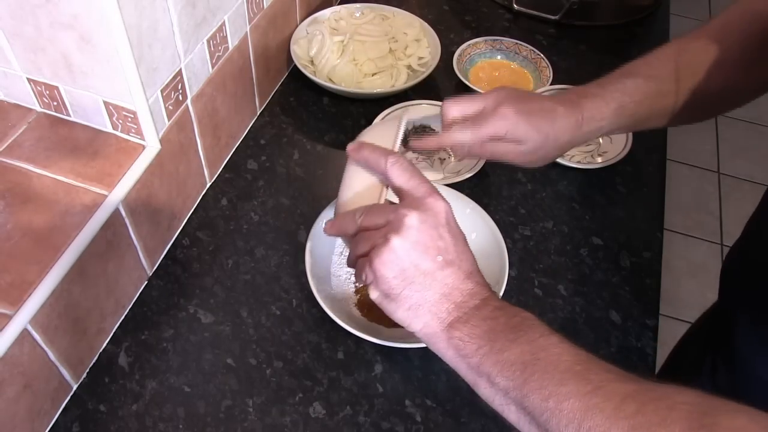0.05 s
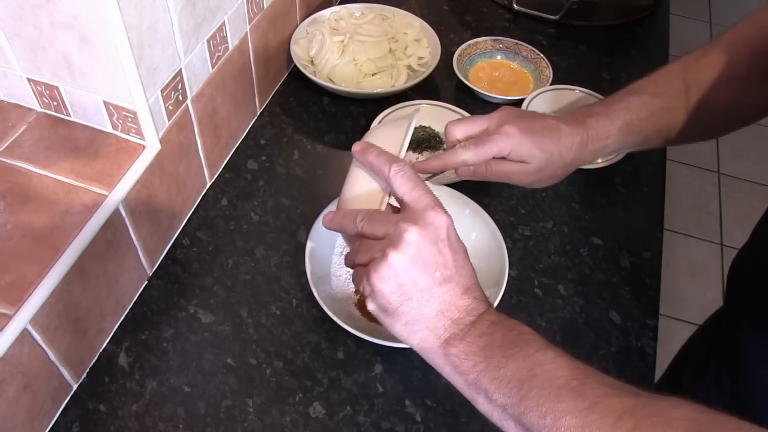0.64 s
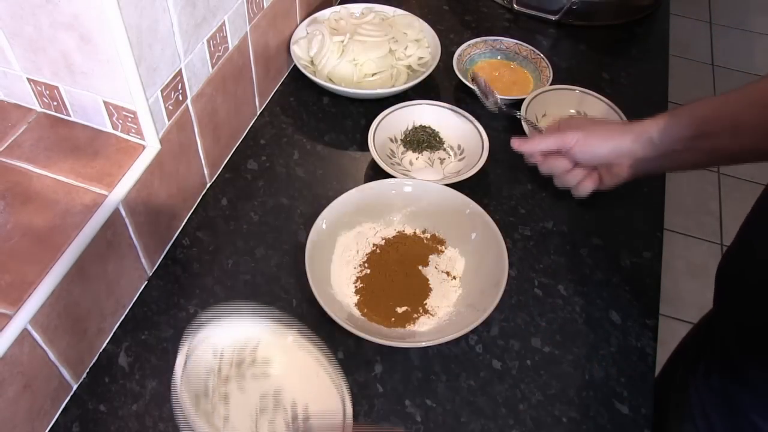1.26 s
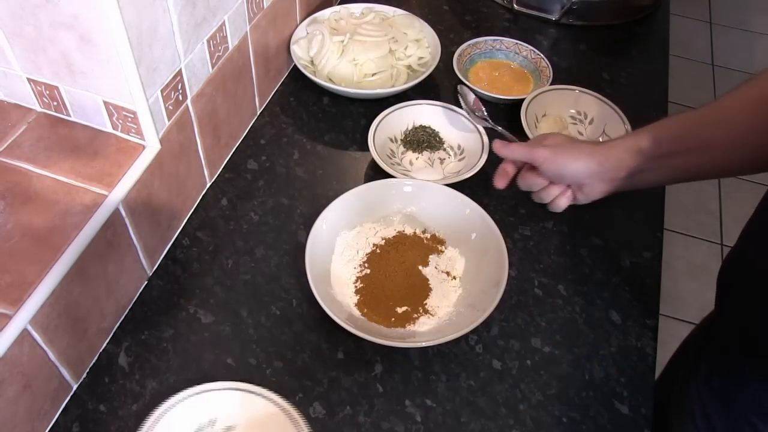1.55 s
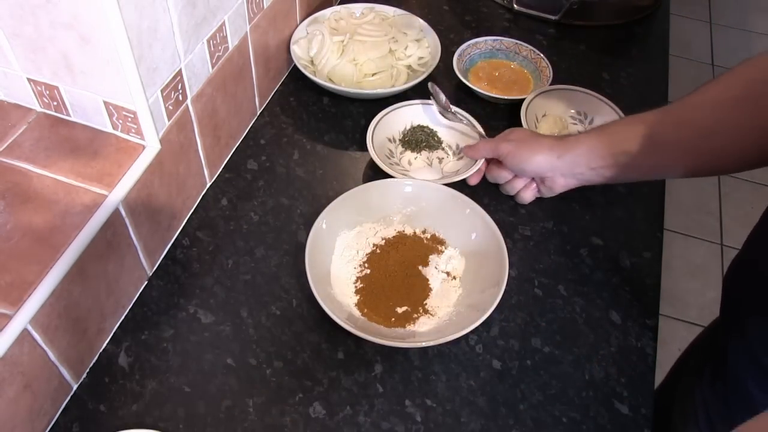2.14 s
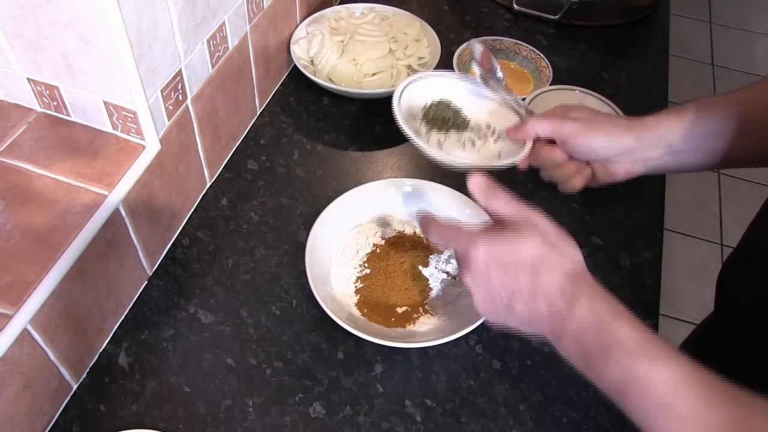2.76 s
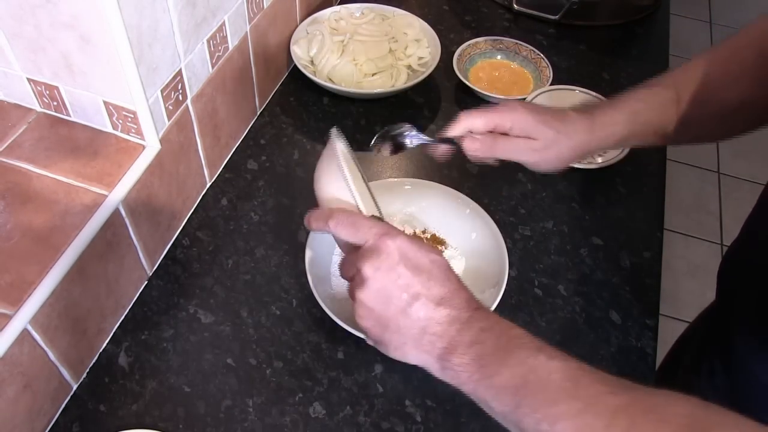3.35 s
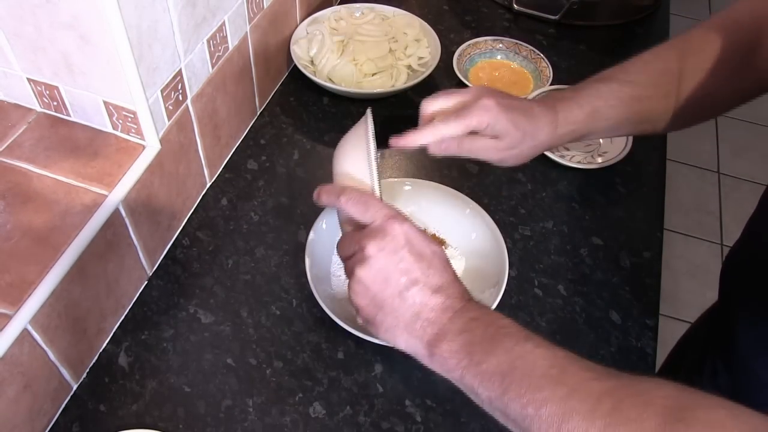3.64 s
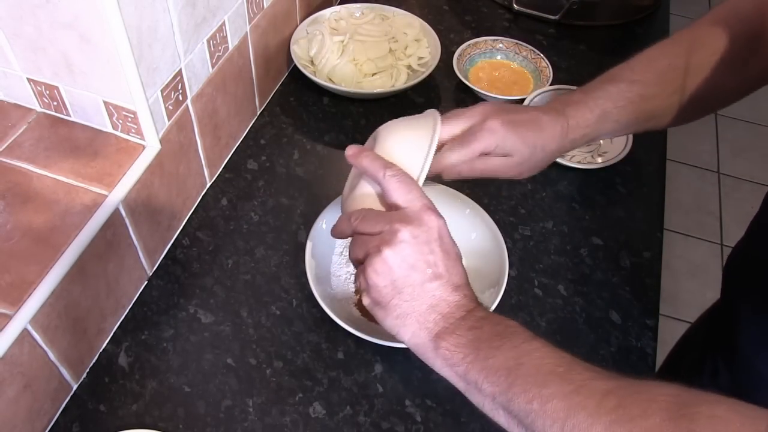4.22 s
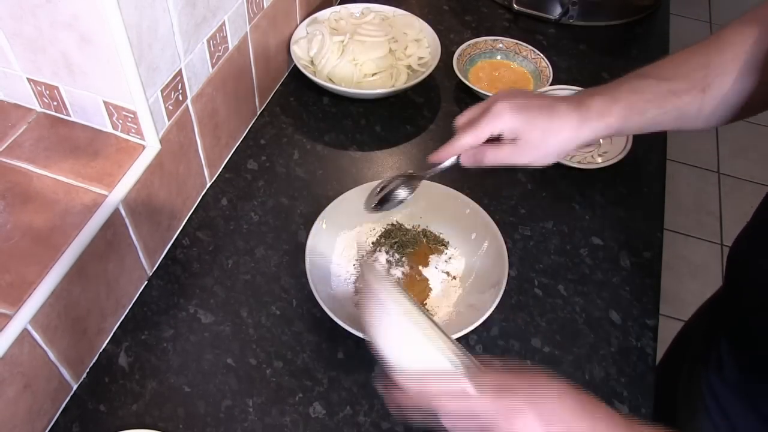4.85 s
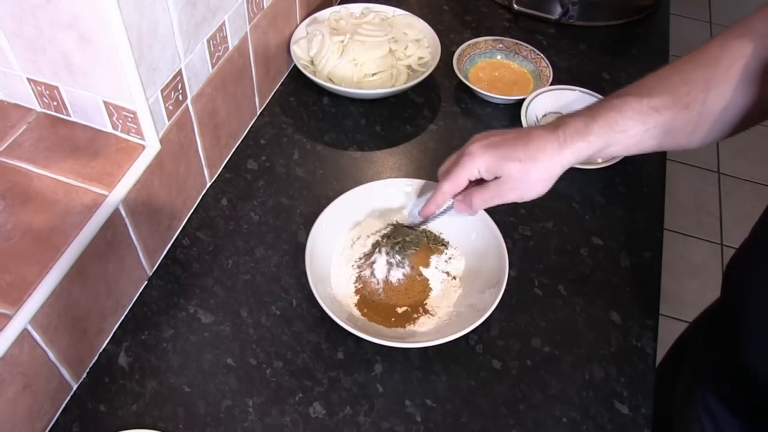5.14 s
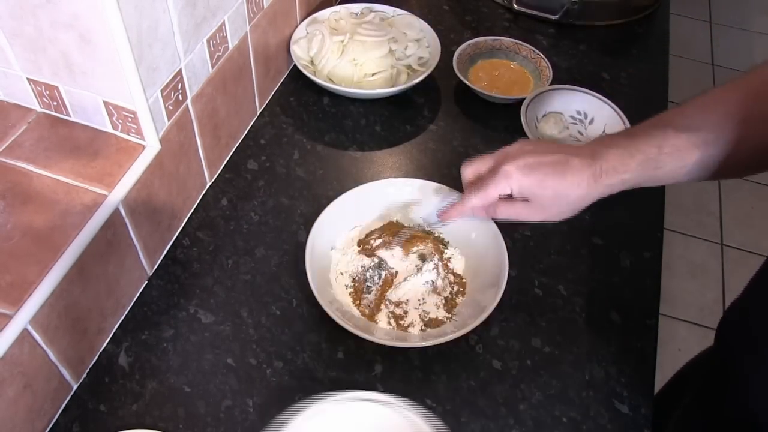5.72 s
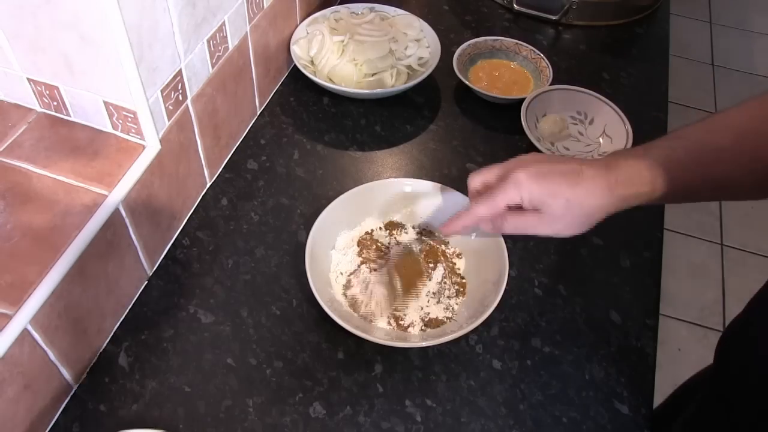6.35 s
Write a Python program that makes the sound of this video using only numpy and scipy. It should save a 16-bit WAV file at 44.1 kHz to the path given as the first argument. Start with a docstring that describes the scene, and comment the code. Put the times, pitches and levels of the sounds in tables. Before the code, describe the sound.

From the start to about 1 second, a metal fork quickly taps and scrapes spices off a small china dish, with sharp ringing clinks and short squeaky rasps. Just after 2 seconds the dish is set down hard on the worktop, a little further off, rocking in several dull knocks; a clear crockery note follows around 2.4 seconds and fades. Dry herbs slide faintly over china just after 3 seconds. From 3.7 to 4.6 seconds the fork scrapes and clinks on a second dish. From about 5.1 seconds it stirs flour in a ceramic bowl: three soft, hissing, gritty strokes, the last near 6.2 seconds, with muffled bumps at 5.2 and 5.5 seconds. A very faint swish recurs about once a second over quiet, steady rumble and hiss. Loud blows sound flattened, and the tiled kitchen's short echo swells back after each.

```python
"""A fork knocks and scrapes spices off two small china dishes into a bowl of flour, in a tiled kitchen.
Each tap makes the china ring; each scrape sticks and slips, so it rasps and squeaks. Between the two
dishes, the emptied one is set down hard and crockery rings on; at the end the fork starts to stir.
A faint swish repeats over the room's rumble and hiss. A fast gain control (an automatic volume knob)
flattens every blow and lets the room's echo swell back up."""
import sys
import numpy as np
from scipy import signal
from scipy.fft import irfft
from scipy.io import wavfile
from scipy.ndimage import uniform_filter1d

SR = 44100
rng = np.random.default_rng(int(sys.argv[2]) if len(sys.argv) > 2 else 0)


def wrap_up_sound(samples):
    """Save the sound to the file named by the first command line argument, as 16-bit audio."""
    columns = np.atleast_2d(samples).T
    # keep every value between -1 and 1, then stretch to whole-number steps
    tamed = np.clip(columns, -1, 1)
    steps = np.round(tamed * 32767).astype(np.int16)
    wavfile.write(sys.argv[1], SR, steps)


N = 286209


def amp(db):
    """Turns decibels into a volume factor."""
    return 10 ** (np.asarray(db) / 20)


def unit(x):
    """Scales a sound to an average power of 1."""
    return x / np.sqrt(np.mean(x ** 2) + 1e-20)


def fade(size, t60):
    """A dying-away curve; the fade time t60 is the seconds it takes to drop 60 dB."""
    return amp(-60 * np.arange(size) / SR / t60)


def read(points, hz):
    """Joins a table's points with straight lines along a scale of octaves."""
    frequency, value = np.transpose(points)
    return np.interp(np.log(hz + 1), np.log(frequency), value)


def add(mix, s, sound):
    """Mixes a sound in at s seconds; it may already be under way when the scene opens."""
    start = round(s * SR)
    sound = sound[max(-start, 0):]
    part = mix[max(start, 0):][:len(sound)]
    part += sound[:len(part)]


def noise(spectrum, size):
    """Steady noise with the given colour (its balance of low and high frequencies)."""
    hz = np.fft.rfftfreq(size, 1 / SR)
    phases = np.exp(2j * np.pi * rng.random(len(hz)))
    return unit(irfft(amp(read(spectrum, hz)) * phases, size))


def burst(spectrum, t60, colour_db=lambda hz: 0):
    """A puff of noise: many crowded vibrations that die quickly."""
    hz = abs(np.fft.fftfreq(8192, 1 / SR))
    puff = rng.standard_normal(len(hz)) * fade(len(hz), t60)
    gain = amp(read(spectrum, hz) + colour_db(hz + 1))
    response = np.exp(np.conj(signal.hilbert(np.log(gain))))  # keeps the start sharp
    puff = np.fft.ifft(np.fft.fft(puff) * response).real
    return puff / np.linalg.norm(puff)


def ring(tones, colour_db=lambda hz: 0, vary_db=2, detune=0.0042):
    """A struck object rings with its own tones; grip and contact point shift them a little each time."""
    hz, db, t60 = np.transpose(tones)[:, :, None]
    loud, shift, sign = rng.standard_normal((3, len(hz), 1))
    t = np.arange(8192) / SR
    waves = np.sign(sign) * np.sin(2 * np.pi * hz * (1 + detune * shift) * t) * fade(len(t), t60)
    waves /= np.linalg.norm(waves, axis=1, keepdims=True)
    return (amp(db + colour_db(hz) + vary_db * loud) * waves).sum(0)


# The tones of each china dish: (frequency [Hz], energy [dB], fade time [s])
SPICE_DISH_TONES = [(1177, -14.5, 0.044), (1326, -16, 0.035), (1620, -20, 0.027), (2330, -19.5, 0.11),
                    (2920, -10, 0.036), (4015, -2, 0.042), (5385, -7, .09), (6045, -10.5, .12),
                    (6510, -13, .07), (6790, -17, .05), (7687, -12.5, .16), (8410, -16, .04),
                    (9910, -19.5, .08), (11340, -15, 0.02), (12370, -17, 0.017)]
HERB_DISH_TONES = [(1230, -12, 0.012), (1960, -11.5, 0.013), (2463, -13.5, 0.041), (2977, -10, 0.04),
                   (3995, -2, 0.038), (4220, -9, 0.025), (4940, -9.5, .05), (5223, -6, 0.072),
                   (5330, -16, 0.092), (5840, -14, 0.12), (6800, -20, 0.083), (7500, -9, 0.074),
                   (8410, -16, 0.1), (11700, -19.5, 0.019)]
# The click of something touching china: (frequency [Hz], level [dB])
CLICK_COLOUR = [(100, -22.5), (300, -16.5), (480, -2.5), (750, -13), (1100, 2.5), (3000, 3), (5000, 3),
                (7000, 3), (9500, -6), (12500, -11), (16000, -35)]
RIM_HZ, STIFFER_DB = 4040, 2  # a spot stiffer than the rim rings higher, and brighter per octave up


def dish(s, contact, click_db, click_t60):
    """The dish in hand rings and clicks; contact is (brightness [dB/octave], favoured Hz, boost dB)."""
    tilt_db, favoured_hz, boost_db = contact
    favour = lambda hz: np.exp(-(np.log2(hz / favoured_hz) / .13) ** 2)
    colour_db = lambda hz: tilt_db * np.log2((hz + 500) / RIM_HZ) + boost_db * favour(hz)
    tones = SPICE_DISH_TONES if s < 2 else HERB_DISH_TONES
    body = ring(tones, colour_db) + amp(click_db) * burst(CLICK_COLOUR, click_t60, colour_db)
    return body / np.linalg.norm(body)


def stroke(length, edge):
    """The pressure of one stroke swells and eases off; an edge under 1 bites and lets go abruptly."""
    progress = np.clip(np.arange(16384) / SR / length, 0, 1)
    return abs(np.sin(np.pi * progress)) ** edge


def slips(rate, jitter, spread_db):
    """Surfaces stick and slip, making uneven clicks, about `rate` each second."""
    gap, size = rng.standard_normal((2, 1500))
    at = (np.cumsum(np.exp(jitter * gap)) * SR / rate).astype(int)
    clicks = amp(spread_db * size) * rng.choice([-1, 1], len(at))
    return unit(np.bincount(at, clicks, 16384)[:16384])


def squeak(progress, from_hz=1130, to_hz=1550, waver=0.0447):
    """Slips fall into a ragged rhythm that quickens as the slide goes on."""
    wander = unit(uniform_filter1d(rng.standard_normal(len(progress)), size=60))
    hz = (from_hz + (to_hz - from_hz) * progress) * (1 + waver * wander)
    cycles = np.cumsum(hz) / SR
    return unit(sum(np.cos(2 * np.pi * k * (cycles + rng.random())) * min(k, 3) for k in range(1, 12)))


def drag(s, length, contact, hiss_db, squeak_db=-0.5, build_db=5):
    """Something slides over the dish, rubbing ever harder; the ring changes along the way."""
    rasp = slips(rate=3200, jitter=.5, spread_db=3)
    progress = np.clip(np.arange(len(rasp)) / SR / length, 0, 1)
    pressure = stroke(length, edge=0.58) * amp(build_db * (progress - .5))
    friction = unit(rasp + amp(squeak_db) * squeak(progress)) * pressure
    sound = 0
    for share in np.cos(np.pi / 2 * progress), np.sin(np.pi / 2 * progress):  # start spot, end spot
        body = dish(s, contact, click_db=hiss_db, click_t60=0.016)
        body *= fade(len(body), t60=.07)  # the contact muffles the ring
        sound = sound + signal.fftconvolve(friction * share, body)
    return sound


# The fork dragged over a dish: (time [s], length [s], level [dB], favoured frequency [Hz])
FORK_SCRAPES = [(-0.02, 0.062, -9, 5250), (0.063, 0.043, -1, 5140), (0.084, 0.051, 5, 7850),
                (0.232, .06, 6.5, 4900), (0.385, 0.063, 5.5, 3610), (0.547, 0.042, 10, 4140),
                (0.659, 0.029, 7, 3980), (3.743, .09, 4.5, 5250), (3.839, 0.073, -21, 5300),
                (4.426, 0.045, 3, 3830)]


def fork_scrapes(typical_s=0.065, boost_db=6.5):
    """Short, rasping drags over the china; longer ones are faster and so brighter."""
    out = np.zeros(N)
    for s, length, db, hz in FORK_SCRAPES:
        tilt_db = 3 * np.log2(length / typical_s) + STIFFER_DB * np.log2(hz / RIM_HZ)
        add(out, s, amp(db - 4) * drag(s, length, (tilt_db, hz, boost_db), hiss_db=-2))
    return out


# The room's background noise: (frequency [Hz], level [dB])
ROOM_COLOUR = [(18, -2.5), (36, -17), (46, 8), (58, -7), (150, -8.5), (190, -16.5), (240, -9), (330, -14.5),
               (480, -18.5), (750, -22.5), (1100, -28), (1760, -30.5), (4060, -33), (16000, -45)]


def room_noise():
    """A quiet, steady rumble and hiss."""
    return amp(-33.5) * noise(ROOM_COLOUR, N)


# How long the kitchen echoes: (frequency [Hz], fade time [s])
ECHO_TIMES = [(150, 0.5), (500, 0.48), (1500, 0.62), (4000, 0.48), (8000, 0.41), (15000, 0.28)]


def kitchen_echo(sound, build_up_s=0.00062, bounces_per_s=5000):
    """Sound bounces densely off the tiles; the highest frequencies die first."""
    t = np.arange(SR) / SR
    bounces = rng.standard_normal(SR) * (rng.random(SR) < bounces_per_s / SR)
    bounces *= 1 - np.exp(-(t / build_up_s) ** 2)
    hz, when, bands = signal.stft(bounces, SR, nperseg=256)
    bands *= amp(-60 * when / read(ECHO_TIMES, hz)[:, None])
    tail = signal.istft(bands, SR, nperseg=256)[1]
    return signal.fftconvolve(sound, tail / np.linalg.norm(tail))[:N]


def blow():
    """One hit, after which the fork's prongs chatter briefly against the china."""
    chatter = slips(rate=1500, jitter=.5, spread_db=3)
    chatter *= fade(len(chatter), t60=0.1)
    return signal.unit_impulse(len(chatter)) + chatter / np.linalg.norm(chatter)


# The fork striking a dish: (time [s], level [dB], favoured frequency [Hz])
FORK_TAPS = [(0.182, 14, 5170), (0.3775, 4, 4400), (0.5413, 12.5, 3770), (0.659, 11.5, 5530),
             (0.7661, 12, 5400), (0.888, 19.5, 5500), (3.7445, 6.5, 5000), (4.0635, 11.5, 6850),
             (4.265, 16, 3706), (4.419, 1, 3780), (4.596, 10, 2370)]


def fork_taps(rim_tilt_db=-2, boost_db=7.5):
    """Sharp clinks: each blow sets the dish ringing."""
    out = np.zeros(N)
    for s, db, hz in FORK_TAPS:
        tilt_db = rim_tilt_db + STIFFER_DB * np.log2(hz / RIM_HZ)
        body = dish(s, (tilt_db, hz, boost_db), click_db=-2.5, click_t60=0.025)
        add(out, s, amp(db + 13) * signal.fftconvolve(blow(), body))
    return out


# A soft swish: (frequency [Hz], level [dB])
SWISH_COLOUR = [(300, -46), (700, -3), (1100, -13), (2000, -8.5), (3300, -9), (6000, -19.5), (12000, -43)]


def swishes(first_s=0.87, every_s=1.042):
    """A faint swish comes round steadily, about once a second."""
    out = np.zeros(N)
    for turn in range(6):
        swell = stroke(length=.135, edge=.8)
        add(out, first_s + turn * every_s, amp(-38) * swell * noise(SWISH_COLOUR, len(swell)))
    return out


# Herbs sliding on a tipped dish: (time [s], length [s], level [dB], favoured frequency [Hz])
HERB_SLIDES = [(1.18, 0.051, -31, 7740), (3.033, 0.05, -35.5, 4000), (3.146, 0.044, -27.5, 5950),
               (3.203, 0.066, -32, 5950), (3.29, 0.15, -40.5, 2730)]


def herb_slides(tilt_db=4.5, boost_db=8.5):
    """Dry herbs and powder slide over the china with a faint, bright hiss."""
    out = np.zeros(N)
    for s, length, db, hz in HERB_SLIDES:
        add(out, s, amp(db - 4.5) * drag(s, length, (tilt_db, hz, boost_db), hiss_db=3.5))
    return out


# The dish landing and rocking: (time [s], level [dB])
DISH_KNOCKS = [(2.139, 18.5), (2.18, 15), (2.2, 4.5), (2.234, 1.5), (2.3165, 15.5)]
# The worktop's thud: (frequency [Hz], level [dB])
THUD_COLOUR = [(50, -51), (110, -5.5), (170, -4.5), (260, 2), (400, -0.5), (800, -2.5), (1100, 0.5),
               (1500, -7.5), (2200, -14), (4000, -28.5), (8000, -37), (16000, -78)]
# The landing dish's tones: (frequency [Hz], energy [dB], fade time [s])
LANDING_TONES = [(3960, 1.5, 0.18), (5260, 6.5, 0.054), (7900, -10, 0.23), (9700, -20, .15),
                 (11700, -24, .15)]


def dish_set_down(hard_knock_db=18.5, dulling=0.66):
    """Dull knocks on the worktop, each with a tick of glaze and a trace of the dish's own ring."""
    out = np.zeros(N)
    for s, db in DISH_KNOCKS:
        tilt_db = dulling * (db - hard_knock_db)  # a softer knock is duller
        thud = burst(THUD_COLOUR, t60=0.083, colour_db=lambda hz: tilt_db * np.log2(hz / 1000 + 1))
        china = amp(-39.5) * ring(LANDING_TONES) + amp(-38) * burst(CLICK_COLOUR, t60=0.0036)
        add(out, s, amp(db + 14) * (thud + china))
    return out


# Crockery being nudged: (time [s], level [dB])
NUDGES = [(2.434, -9), (2.482, -22.5)]


def crockery_chime(hz=1141.4, t60=1.125, rise_s=.004):
    """Each nudge feeds the same clear, slowly fading note."""
    t = np.arange(N) / SR
    swing = sum(amp(db - 60 * abs(t - s) / t60) * np.clip((t - s) / rise_s, 0, 1) for s, db in NUDGES)
    return swing * np.sin(2 * np.pi * hz * t)


# The fork pushing through flour: (time [s], length [s], hiss [dB], grinding [dB], push [dB])
STIR_STROKES = [(5.131, 0.083, -41, -23, -56), (5.456, 0.11, -36.5, -44, -24),
                (6.159, 0.074, -32, -34.5, -42)]
# Hissing flour, the bowl pushing on the worktop, and crushed grains: (frequency [Hz], level [dB])
FLOUR_COLOUR = [(500, 7.5), (1300, 5.5), (3000, -0.5), (5000, -1.5), (7300, 1.5), (10000, -9.5),
                (16000, -23)]
PUSH_COLOUR = [(25, -29), (45, -2), (80, -19), (165, -14.5), (260, -55), (600, -57)]
GRIT_COLOUR = [(100, -18), (260, 0), (560, 4), (800, -13), (1500, -4), (3000, -17), (7000, -26),
               (16000, -53)]
# The bowl's tones, muffled by flour: (frequency [Hz], energy [dB], fade time [s])
BOWL_TONES = [(252, 2, 0.068), (347, -3, 0.011), (497, -3.5, 0.11), (980, -5, 0.0077), (1250, -13, 0.011),
              (1570, -12, 0.023), (2150, -23, 0.018), (2970, -12, 0.028)]


def stirring(grind_lag_s=.022):
    """Flour hisses round the prongs, grit grinds on the glaze, and the bowl presses on the worktop."""
    out = np.zeros(N)
    for s, length, hiss_db, grind_db, push_db in STIR_STROKES:
        pressure = stroke(length, edge=0.82)
        hiss = amp(hiss_db) * noise(FLOUR_COLOUR, len(pressure))
        push = amp(push_db) * noise(PUSH_COLOUR, len(pressure))
        add(out, s, pressure * (hiss + push))
        body = ring(BOWL_TONES) + amp(2) * burst(GRIT_COLOUR, t60=0.013)
        grit = pressure * slips(rate=770, jitter=.6, spread_db=4.5)
        grind = signal.fftconvolve(grit, body / np.linalg.norm(body))
        add(out, s + grind_lag_s, amp(grind_db) * grind)  # the prongs must part the flour first
    return out


# The fork bumping the bowl: (time [s], level [dB])
BOWL_BUMPS = [(5.182, 2), (5.528, 3.5)]


def bowl_bumps():
    """The fork meets the bowl under the flour: a muffled ring and a puff of powder."""
    out = np.zeros(N)
    for s, db in BOWL_BUMPS:
        bump = amp(-12) * ring(BOWL_TONES) + amp(-10) * burst(FLOUR_COLOUR, t60=0.043)
        add(out, s, amp(db) * bump)
    return out


def scene():
    """Mixes all the sounds with the kitchen's echo, in one channel."""
    dishes = fork_taps() + fork_scrapes() + herb_slides()
    knocks = dish_set_down()  # further off, so it gets more echo
    soft_sounds = stirring() + bowl_bumps() + swishes()
    echo = kitchen_echo(amp(-6.5) * dishes + amp(4) * knocks + amp(-2.5) * soft_sounds)
    return (dishes + knocks + crockery_chime() + soft_sounds + echo + room_noise())[None]


def record(dry, limit_db=-13.5, recover_db_per_s=115, attack_s=0.0021, smooth_s=.007, top_hz=15850):
    """Gain control turns loud moments down fast and soon lets go; the very start of a blow distorts."""
    memory, lag = np.exp(-1 / (smooth_s * SR)), np.exp(-1 / (attack_s * SR))
    power_db = 10 * np.log10(signal.lfilter([1 - memory], [1, -memory], dry[0] ** 2) + 1e-12)
    excess_db = np.maximum(power_db - limit_db, 0)
    recovery_db = np.arange(N) / SR * recover_db_per_s
    cut_db = np.maximum.accumulate(excess_db + recovery_db) - recovery_db
    turned_down = dry * amp(-signal.lfilter([1 - lag], [1, -lag], cut_db))
    treble_cut = signal.firwin(601, top_hz, window=("kaiser", 9), fs=SR)
    return signal.oaconvolve(np.clip(turned_down, -1, 1), treble_cut[None], "same")


dry = scene()
out = record(dry)
wrap_up_sound(out)
```